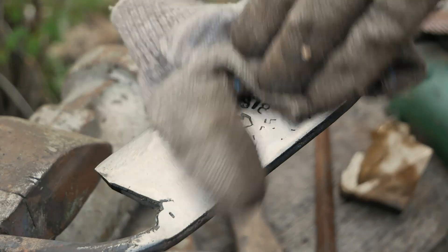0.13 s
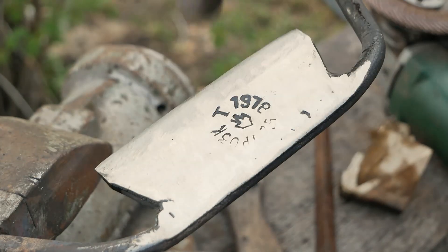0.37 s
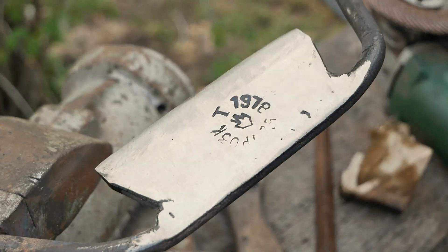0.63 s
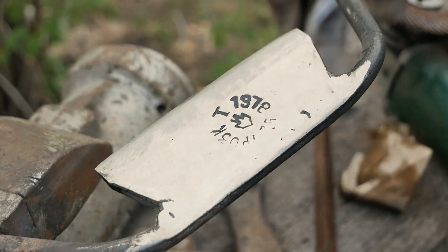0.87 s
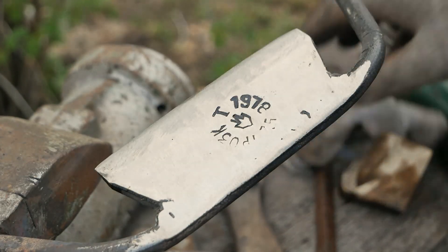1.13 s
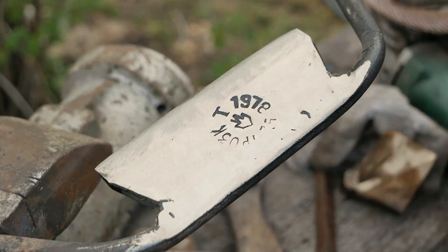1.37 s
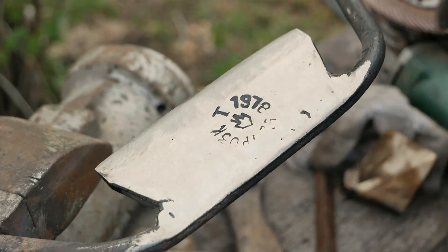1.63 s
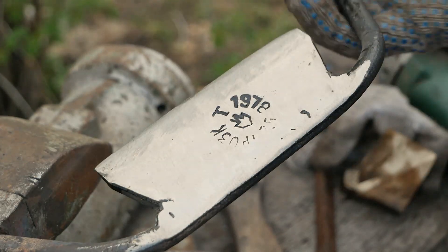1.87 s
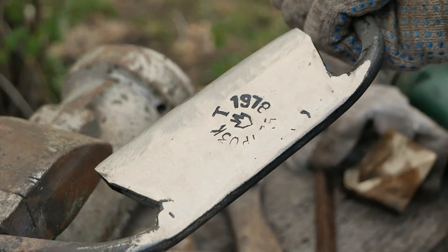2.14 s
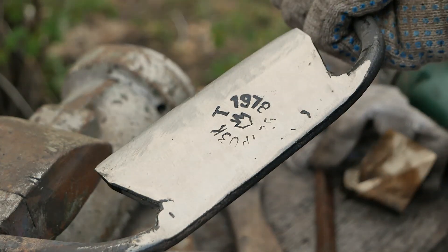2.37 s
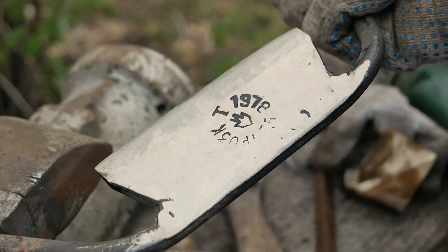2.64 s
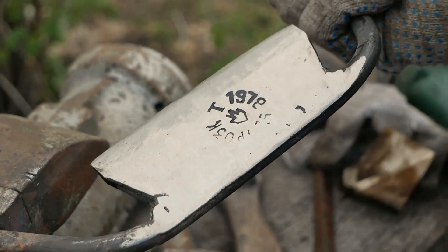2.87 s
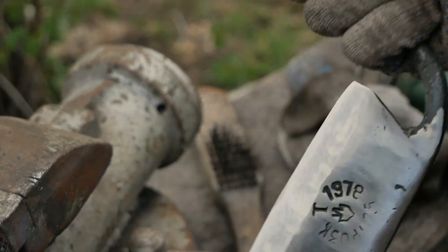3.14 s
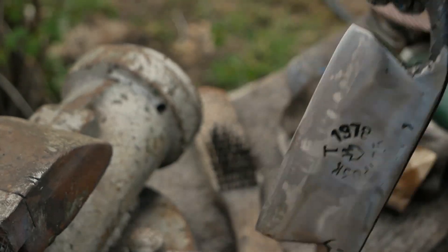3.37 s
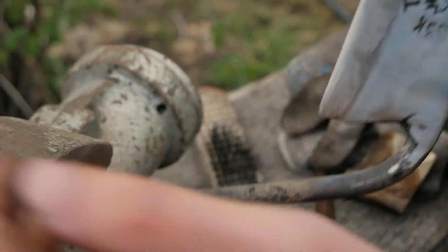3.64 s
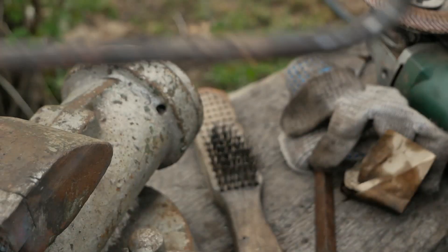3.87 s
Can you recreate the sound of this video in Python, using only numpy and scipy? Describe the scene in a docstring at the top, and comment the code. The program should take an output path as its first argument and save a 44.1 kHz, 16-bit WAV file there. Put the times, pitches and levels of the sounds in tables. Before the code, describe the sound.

A steel blade is lifted off a metal support outdoors, heard close. Until 2.5 s there is only soft hush, faint glove rubbing around 0.3 s and tiny ticks. At 2.57-2.72 s it scrapes and knocks in a dry cluster; small knocks follow. Loud, short clanks strike at 3.15 and 3.34 s, a faint bright ring at 3.4, a brief dip, then a final clank at 3.65 s.

```python
"""Outdoors, a gloved hand brushes and grips a steel blade that rests on a metal support.
The blade scrapes and knocks while seated, clanks as it is lifted off, rings free once and taps again.
Slips and blows excite damped steel modes; the glove is coloured grains, sung tones and noise ticks.
A short scattered echo and a soft distant hush, both filtered noise, lie behind.
A gain common to all of these dips briefly near the end, recovers and sinks again."""
import sys
import numpy as np
from scipy import signal
from scipy.fft import rfft, irfft
from scipy.io import wavfile

SR = 44100
rng = np.random.default_rng(int(sys.argv[2]) if len(sys.argv) > 2 else 0)


def bounce(signal):
    """Save signal as a 16-bit WAV file at the path given by the first command-line argument."""
    frames = np.transpose(np.atleast_2d(signal))
    limited = np.clip(frames, -1, 1)
    pcm = np.round(limited * 32767).astype(np.int16)
    wavfile.write(sys.argv[1], SR, pcm)


def ratio(d):
    """dB to gain"""
    e = np.asarray(d, float) / 20
    return 10 ** e


N = 176400

# All levels are those of the sources, ahead of the common gain and the microphone.
# modes of the seated blade and support: frequency_hz
SEATED_MODE_HZ = [262, 385, 440, 500, 590, 765, 860, 1176, 1323, 1510, 1850, 2120, 2720, 3490, 3900, 4540,
                  5190, 6400, 9800, 10300]
# their strength and full decay: relative_level_db, t60_s
SEATED_MODES = [(-13.5, 0.058), (-2, 0.054), (-9, .05), (-11, 0.054), (-8.5, 0.12), (-2.5, 0.075),
                (-9, 0.03), (-7.5, 0.069), (-7, 0.051), (-4.5, 0.03), (-7, 0.046), (-1.5, 0.022), (-8, .02),
                (-12, 0.014), (-14.5, .015), (-20.5, 0.012), (-26, 0.02), (-31, 0.011), (-41, .015),
                (-35.5, 0.018)]
# stick-slip scraping of the seated blade: time_s, level_db, brightness_db_per_octave about 1 kHz
SCRAPE_COURSE = [(2.5, -130, 2), (2.565, -85, -13), (2.575, -29.5, 3.5), (2.588, -46.5, 1.5),
                 (2.6, -66, 8.5), (2.606, -41.5, 0), (2.65, -40, 0.5), (2.69, -40, 1), (2.7, -43, -12.5),
                 (2.71, -34, 2), (2.73, -52.5, 5.5), (2.755, -59.5, -6.5), (2.79, -76.5, -15),
                 (2.96, -63, 3), (2.98, -57.5, -9.5), (3.06, -58.5, 0.5), (3.07, -38.5, -8.5),
                 (3.085, -43, 1), (3.1, -58, 4.5), (3.115, -37, -1.5), (3.125, -48.5, 0.5),
                 (3.145, -47, 3.5), (3.16, -54.5, 7), (3.2, -83.5, -9), (3.3, -130, -1)]
# knocks of the blade on the support, and low thumps of the support as the lifted blade clanks: start_s,
# peak_db, contact_centre_hz, contact_width_octaves, # ring_share of the full decay, crack_db relative to the
# ring
KNOCKS = [(2.572, -24.5, 2780, 0.34, 1, 3.5), (2.579, -38, 2100, 0.46, .6, -13),
          (2.586, -35, 840, .5, .4, -10), (2.605, -25.5, 2300, 0.43, 1, -5.5),
          (2.631, -32, 2160, .6, .6, 2), (2.644, -29, 3400, 0.94, .6, -16), (2.66, -29, 1490, 1, .7, 5.5),
          (2.702, -21, 2980, 0.82, 0.6, -0.5), (2.706, -16.5, 1880, 0.55, .6, -29),
          (2.723, -30, 2540, 1.4, .4, -8), (2.789, -35, 735, 1.42, 0.5, -2.5),
          (2.861, -37, 1480, 2.4, 0.62, -16), (2.972, -35, 2100, 0.52, 0.26, -2.5),
          (3.004, -40.5, 910, 0.52, 0.31, -6.5), (3.077, -25.5, 3160, 0.5, 0.32, 0.5),
          (3.104, -25.5, 404, 0.65, 0.57, -12), (3.113, -15.5, 424, 0.73, .3, -9.5),
          (3.287, -36, 255, 0.29, 0.39, -2), (3.338, -42, 300, 1.03, 0.36, 0),
          (3.368, -30, 2510, 0.63, 0.21, -12.5), (3.415, -41, 1910, 0.28, 0.34, -6),
          (3.46, -39, 500, 0.51, .6, -11), (3.652, -32, 278, 0.65, 0.87, -5)]
# modes of the lifted blade damped by the glove: frequency_hz
HELD_MODE_HZ = [260, 377, 826, 1100, 1400, 1746, 1972, 2406, 3073, 3465, 3860, 4300, 4640, 4885, 5180, 5360,
                6290, 7570, 9950, 10230, 10490]
# their strength and full decay: relative_level_db, t60_s
HELD_MODES = [(-12, 0.095), (-10.5, .05), (-8, 0.22), (-4.5, 0.032), (-6, 0.042), (-7, 0.083),
              (-0.5, 0.043), (-29.5, 0.026), (-1, 0.084), (-1.5, 0.031), (-4.5, 0.039), (-10, 0.04),
              (-16, 0.05), (-18, 0.047), (-14, .08), (-17.5, 0.06), (-18, 0.023), (-27, 0.093),
              (-26.5, 0.052), (-30.5, 0.11), (-32, 0.15)]
# the lifted blade slides along the support's edge: time_s, level_db, brightness_db_per_octave about 1 kHz
SLIDE_COURSE = [(3.15, -140, 0), (3.195, -90, 7), (3.212, -78.5, 11.5), (3.22, -74.5, 17.5),
                (3.225, -75, 7), (3.245, -83.5, 6.5), (3.27, -76.5, 7), (3.29, -69, 13.5),
                (3.33, -73.5, 9.5), (3.36, -57.5, -4.5), (3.39, -63, -3.5), (3.45, -77, 9), (3.56, -120, 0)]
# clanks of the held blade: columns as for the knocks
HELD_CLANKS = [(3.149, -2, 2690, 1.39, 0.64, -18), (3.222, -28, 6000, 3.4, 0.27, 3.5),
               (3.283, -31.5, 2320, 0.85, 0.45, 0), (3.286, -11, 2420, 0.35, 0.55, -13),
               (3.337, -2, 3036, 0.48, 0.086, -7), (3.338, -21, 10600, 0.54, 0.45, -5.5),
               (3.342, -25, 2900, 1, 0.37, -11.5), (3.651, -10, 2700, 1.46, 0.34, -4.5)]
# modes of the blade hanging free: frequency_hz
FREE_MODE_HZ = [1712, 2907, 3015, 3914, 4608, 4958, 5631, 5927, 6261, 6481, 6560, 7122, 7623, 8060, 9090,
                9168, 9800, 9948, 10690, 11300, 12250, 12740, 13440, 14240]
# their strength and full decay: relative_level_db, t60_s
FREE_MODES = [(9.5, 0.032), (-9, 0.52), (-13, 0.24), (-2, 0.65), (-17, 0.092), (-13, 0.23), (-15, 0.27),
              (-4.5, 0.32), (-8.5, 0.35), (-4.5, 0.3), (-13, 0.3), (-15, 0.15), (-7, 0.35), (0, 0.18),
              (-10, 0.18), (3.5, 0.24), (-11, .22), (-9.5, .25), (-10, 0.41), (-18, .2), (-17, 0.24),
              (-15.5, .08), (-19, .33), (-26, .5)]
# the free ring: columns as for the knocks
FREE_CLINKS = [(3.391, -32.5, 4940, 4.9, 0.85, 19.8)]
# glove rubbing on steel: time_s, level_db
RUB_COURSE = [(0, -75), (.06, -74), (.075, -61), (.12, -79), (.17, -63.5), (.24, -56), (.29, -52.5),
              (.33, -56.5), (.4, -66), (.46, -73), (.8, -75), (.82, -57), (.85, -79), (1.05, -82),
              (1.13, -61.5), (1.17, -85), (1.23, -67), (1.33, -79), (1.4, -91), (1.81, -89), (1.85, -66),
              (1.98, -67.5), (2.02, -98), (2.15, -78), (2.28, -65.5), (2.42, -81), (2.9, -83),
              (3.05, -67.5), (3.2, -58), (3.23, -53.5), (3.32, -64), (3.45, -69.5), (3.8, -71.5), (4, -67)]
# spectrum of the rubbing: frequency_hz, relative_density_db per Hz
RUB_SPECTRUM = [(530, -28.5), (900, -9), (1300, -11), (1890, -1), (2820, -4.5), (3290, -3.5), (3530, -4),
                (6740, -14.5), (8130, -19), (10300, -15), (15000, -46)]
# the wiped blade sings faintly: start_s, length_s before the decay, pitch_hz, level_db
SUNG_TONES = [(0.196, .05, 9820, -75), (0.3, 0.1, 5320, -69), (0.31, 0.05, 3350, -62),
              (1.292, 0.081, 577, -67), (1.83, 0.1, 5510, -77), (1.87, .06, 5300, -76),
              (1.885, .05, 3370, -67), (1.95, 0.06, 3370, -73), (1.888, 0.078, 1870, -70.5)]
# glove fibres tick: start_s, peak_db, centre_hz, half_width_octaves
FIBRE_TICKS = [(.066, -48, 6000, 1.5), (.166, -52, 8000, 1.2), (.305, -46, 1900, .8),
               (.393, -52, 7000, 1.2), (.416, -53, 3500, 1.1), (.518, -53, 2600, .3), (.82, -52, 5000, 1.2),
               (1.125, -52, 6000, 1.3), (1.173, -49, 2250, .2), (1.205, -51, 3000, .9),
               (.283, -49, 7000, .9), (1.305, -40, 1200, 1.1), (1.39, -47, 1000, .6),
               (1.865, -53, 8000, 1.2), (1.95, -48, 400, .6), (2.455, -35, 900, 1.1),
               (2.502, -41, 2600, .6)]
# outdoor hush: time_s, level_db
HUSH_COURSE = [(0, -52.5), (.6, -54), (1.2, -55), (1.8, -57.5), (2.28, -53.5), (2.5, -55.5), (3.2, -55),
               (3.6, -57.5), (4, -44)]
# spectrum of the hush: frequency_hz, relative_density_db per Hz
HUSH_SPECTRUM = [(12, -48.5), (22, -20), (55, -19.5), (110, -7.5), (200, -4.5), (400, -4), (800, -7),
                 (1300, -11.5), (2200, -17.5), (3900, -25.5), (6500, -38), (10000, -47.5), (15600, -44.5)]
# left-right likeness of the hush: frequency_hz, correlation from -1 to 1 (no unit)
HUSH_LIKENESS = [(60, -.1), (150, 0.038), (380, -0.13), (950, -0.31), (2380, 0.48), (5980, 0.26),
                 (15000, -0.21)]
# left-right balance of the hush: frequency_hz, left_minus_right_db
HUSH_LEAN = [(60, 3.5), (180, -3), (550, -0.5), (1650, 0.5), (15000, -0.5)]
# gain common to blade, glove, echo and hush: time_s, gain_db
COMMON_GAIN = [(3.44, 2.5), (3.5, -4), (3.55, -19), (3.6, -13), (3.66, 0), (3.8, -4.5), (3.95, -8.5)]
# microphone resonances: centre_hz, width_hz, gain_db
MIC_PEAKS = [(2550, 1400, -3.5), (8140, 500, -5), (10310, 2900, 0.5)]


def rms_one(x):
    """Normalisation: a signal of unit effective value."""
    return x / np.sqrt(np.mean(x ** 2) + 1e-20)


def in_time(rows):
    """Linear interpolation of each column over time."""
    time_s, *columns = np.transpose(rows)
    return [np.interp(np.arange(N) / SR, time_s, column) for column in columns]


def at_hz(points, hz):
    """Interpolation along a logarithmic frequency axis."""
    table_hz, values = np.transpose(points)
    return np.interp(np.log(hz), np.log(table_hz), values)


def spectrum_hz():
    """Discrete Fourier frequencies, with zero raised to 1 Hz for the logarithm."""
    return np.maximum(np.arange(N // 2 + 1) * SR / N, 1)


def coloured(x, spectrum):
    """Spectral shaping: multiplication by a frequency response; rms 1."""
    return rms_one(irfft(rfft(x) * ratio(at_hz(spectrum, spectrum_hz())), N))


def band(x, order, edges_hz, kind="band"):
    """Butterworth filtering: a maximally flat passband."""
    return signal.sosfilt(signal.butter(order, edges_hz, kind, fs=SR, output="sos"), x)


def drift(rate_hz):
    """Low-pass random process: noise through two equal poles, spread 1."""
    pole = np.exp(-80 * np.pi * rate_hz / SR)  # computed at every 40th sample
    noise = rng.standard_normal(N // 40 + 2002)
    slow = signal.lfilter([1], [1, -2 * pole, pole * pole], noise)[2000:]
    return np.interp(np.arange(N) / 40, np.arange(len(slow)), rms_one(slow))


def ring(clicks, hz, t60_s):
    """Damped resonator: a unit click sets off a sine of initial height 1."""
    radius, angle = ratio(-60 / (t60_s * SR)), 2 * np.pi * hz / SR
    poles = [1, -2 * radius * np.cos(angle), radius * radius]
    return signal.lfilter([0, np.sin(angle)], poles, clicks + 1e-18)


def grains(per_s, spread_db):
    """Random impulse train: clicks of uneven size and sign; rms 1."""
    sizes = ratio(spread_db * np.minimum(rng.exponential(1, N), 4))
    signs = rng.choice([-1, 1], N)
    return rms_one(sizes * signs * (rng.random(N) < per_s / SR))


def burst(hz, octaves, t60_s, size):
    """Band-limited transient: exponentially decaying noise around hz; peak 1."""
    edges = np.clip(hz * 2. ** np.array([-octaves, octaves]), 30, .44 * SR)
    decay = ratio(-60 * np.arange(size) / SR / t60_s)
    x = band(rng.standard_normal(size) * decay, 3, edges)
    return x / np.abs(x).max()


def scrape(course, mode_hz, modes, grit_db, slips_per_s):
    """Stick-slip excitation: uneven slips drive the modes and grit adds a broad rasp."""
    level_db, tilt = in_time(course)
    slips = grains(slips_per_s, spread_db=4.0)
    grit = band(slips * ratio(level_db + grit_db + 2.4 * tilt), 4, [900, 5000])
    sung = 0
    for hz, (mode_db, t60_s) in zip(mode_hz, modes):
        wander_db = 2.5 * drift(25)
        drive = slips * ratio(level_db + tilt * np.log2(hz / 1000) + mode_db + wander_db)
        drive = band(drive, 2, [hz / 1.25, min(hz * 1.25, .44 * SR)])
        # the square root offsets the greater build-up of long rings
        sung = sung + ring(drive, hz, t60_s) / np.sqrt(t60_s * SR / 27.6)
    return sung + grit


def blows(rows, mode_hz, modes, wobble_db=1.5, size=14000):
    """Modal impact: a blow cracks and excites most the modes near its contact centre."""
    out, t = np.zeros((2, N + size)), np.arange(size) / SR
    hz = np.array(mode_hz)[:, None]
    mode_db, t60_s = np.transpose(modes)[:, :, None]
    for start_s, peak_db, centre_hz, octaves, share, crack_db in rows:
        octaves = max(octaves, .2)
        luck = rng.normal(0, 1, (3, len(modes), 1))
        reach_db = np.maximum(-6 * (np.log2(hz / centre_hz) / octaves) ** 2, -15.5)
        wobble_hz = 25 * (1 + 0.28 * luck[1])
        wobble = wobble_db * np.sin(2 * np.pi * wobble_hz * t + 3 * luck[0])
        decay_db = 60 * t / (t60_s * max(share, .05))
        rise = np.minimum(t * hz / 1.2, 1)  # over 1.2 periods
        shape = ratio(mode_db + reach_db + luck[0] + wobble - decay_db) * rise
        # each mode reaches the two sides a little apart in phase (radians)
        apart = 0.46 * (1000 / hz) ** .3 * np.sign(luck[2])
        phase = 2 * np.pi * hz * t + 1.1 * luck[1]
        rings = np.array([(shape * np.sin(phase + sign * apart)).sum(0) for sign in (1, -1)])
        crack = band(burst(centre_hz, octaves, t60_s=0.014, size=size), 2, 6500, "low")
        at = int(start_s * SR)
        out[:, at:at + size] += ratio(peak_db) * (rings / np.abs(rings).max() + ratio(crack_db) * crack)
    return out[:, :N]


def seated_blade():
    """Coupled bodies: blade and support share modes, driven by slips and knocks."""
    scraping = scrape(SCRAPE_COURSE, SEATED_MODE_HZ, SEATED_MODES, grit_db=-22, slips_per_s=950)
    knocks = blows(KNOCKS, SEATED_MODE_HZ, SEATED_MODES)
    return band(scraping + knocks, 3, 147, "high")


def lifted_blade():
    """Change of damping: the held blade slides and clanks, the free one rings longer."""
    sliding = scrape(SLIDE_COURSE, HELD_MODE_HZ, HELD_MODES, grit_db=-15.5, slips_per_s=5000)
    clanks = blows(HELD_CLANKS, HELD_MODE_HZ, HELD_MODES)
    clinks = blows(FREE_CLINKS, FREE_MODE_HZ, FREE_MODES, wobble_db=4.5)
    return band(sliding + clanks + clinks, 3, 147, "high")


def glove():
    """Friction noise: knitted fibres hiss over the steel, make it sing now and then, and tick."""
    t = np.arange(N) / SR
    fibres = grains(per_s=5100, spread_db=3.0) * ratio(2.0 * drift(30))
    out = ratio(in_time(RUB_COURSE)[0]) * coloured(fibres, RUB_SPECTRUM)
    # bright rustle as the fingers close
    rustle = rms_one(band(fibres, 2, [8600, 11800]))
    out = out + ratio(-78) * rustle * (t > 1.84) * (t < 2.0)
    rise_s, t60_s = 0.0088, 0.17
    for start_s, length_s, hz, level_db in SUNG_TONES:
        rise = np.clip((t - start_s) / rise_s, 0, 1)
        decay_db = 60 * np.maximum(t - start_s - length_s, 0) / t60_s
        shape = rise * ratio(level_db - decay_db + 1.7 * drift(22))
        out = out + 2 ** .5 * shape * np.sin(2 * np.pi * hz * t + 1.2 * drift(17))
    out = np.append(out, np.zeros(4000))
    for start_s, peak_db, hz, octaves in FIBRE_TICKS:
        at = int(start_s * SR)
        out[at:at + 4000] += ratio(peak_db) * burst(hz, octaves, t60_s=.016, size=4000)
    return out[:N]


def yard(x):
    """Diffuse scattering: a short dull echo from nearby things, different on each side."""
    t = np.arange(8000) / SR
    decay = ratio(-60 * t / 0.13) * (t > .002)  # t60 0.13 s after a 2 ms gap
    tail = band(rng.standard_normal((2, 8000)) * decay, 2, [150, 3300])
    tail = tail / np.sqrt((tail ** 2).sum(1, keepdims=True))
    return signal.fftconvolve(x[None], tail, axes=1)[:, :N]


def hush():
    """Partial coherence: distant outdoor noise, in part alike on both sides, gently wavering."""
    hz = spectrum_hz()
    waver_db = [0.86 * drift(11), 1.3 * drift(4.6)]
    mid, side = rfft(rng.standard_normal((2, N)) * ratio(waver_db))
    alike = np.clip(at_hz(HUSH_LIKENESS, hz), -1, 1)
    lean_db = at_hz(HUSH_LEAN, hz) / 2
    common, opposed = np.sqrt(1 + alike) * mid, np.sqrt(1 - alike) * side
    both = np.array([common + opposed, common - opposed])
    out = irfft(both * ratio(at_hz(HUSH_SPECTRUM, hz) + [lean_db, -lean_db]), N)
    return rms_one(out) * ratio(in_time(HUSH_COURSE)[0])


def scene():
    """Superposition: direct sources, echo and hush add under one common gain."""
    seated, lifted, hand = seated_blade(), lifted_blade(), glove()
    # each source leans slightly to one side (left dB, right dB)
    near = seated * ratio([[-1.2], [1.2]]) + lifted * ratio([[-.3], [.3]]) + hand * ratio([[.3], [-.3]])
    echo = ratio(-21.5) * yard((seated + lifted).mean(0) + hand)
    return (near + echo + hush()) * ratio(in_time(COMMON_GAIN)[0])


def top_cut(x):
    """Nothing passes above the cut-off."""
    return signal.sosfilt(signal.butter(12, 15770, fs=SR, output="sos"), x)


def record(dry):
    """Linear filtering: the microphone dips and lifts the treble, hisses, and the top is cut."""
    for hz, width_hz, gain_db in MIC_PEAKS:
        angle, a = 2 * np.pi * hz / SR, ratio(gain_db / 2)
        q = np.sin(angle) * width_hz / hz / 2
        middle = -2 * np.cos(angle)
        dry = signal.lfilter([1 + q * a, middle, 1 - q * a], [1 + q / a, middle, 1 - q / a], dry)
    hiss = ratio(-86.5) * rng.standard_normal((2, N))
    heard = band(dry, 2, 11400, "low") + hiss
    mix = signal.sosfilt(signal.cheby2(12, 60, 15700, fs=SR, output="sos"), heard)
    return top_cut(mix)


dry = scene()
out = record(dry)
bounce(out)
```